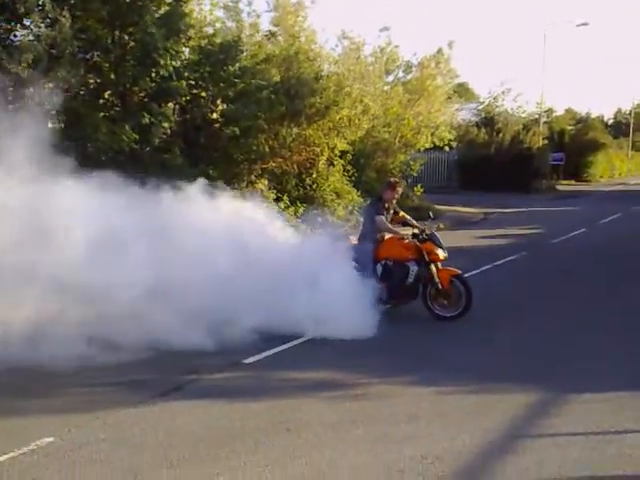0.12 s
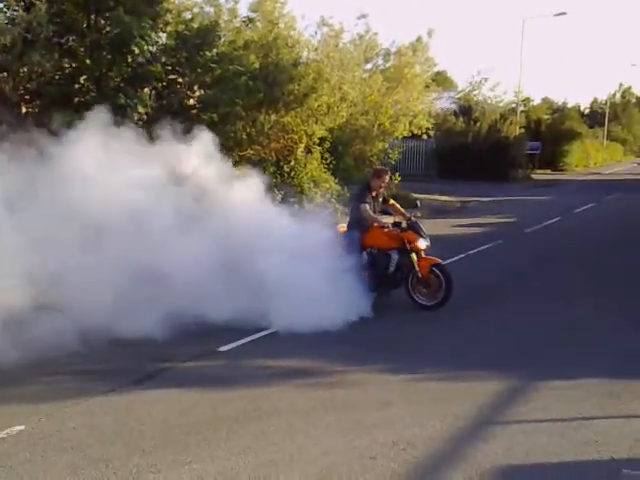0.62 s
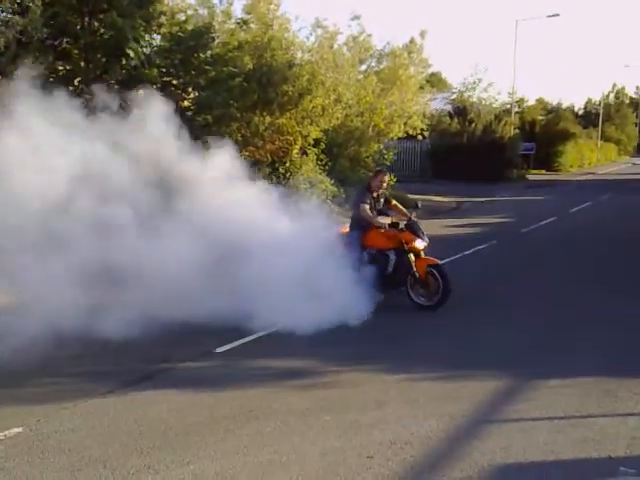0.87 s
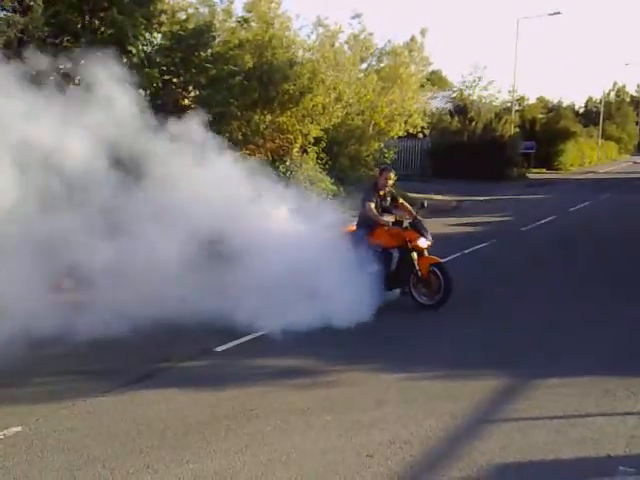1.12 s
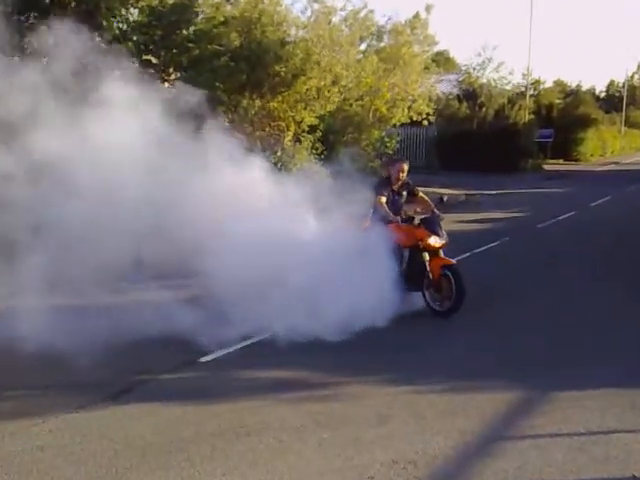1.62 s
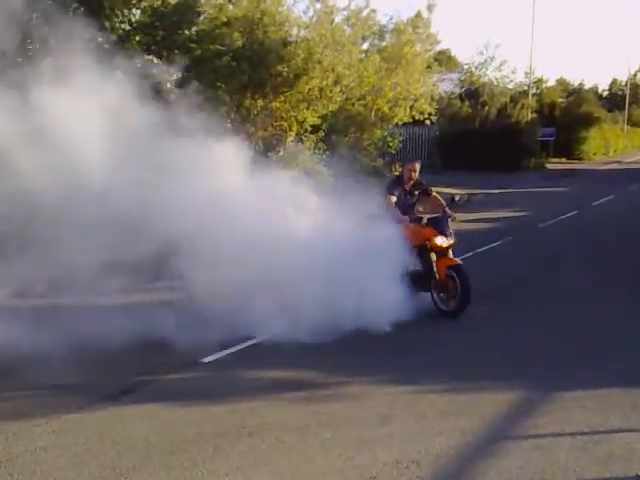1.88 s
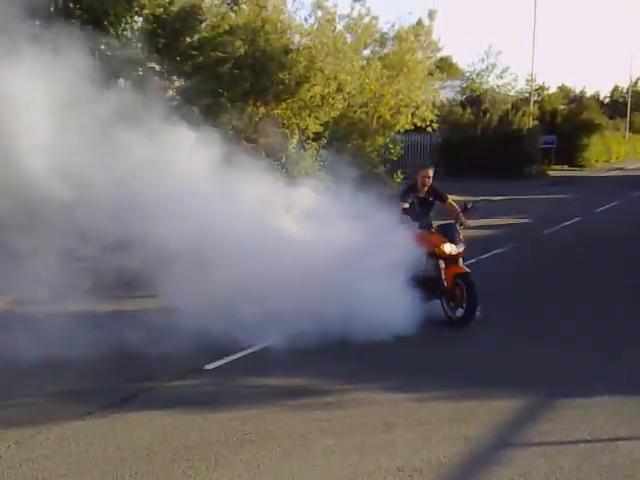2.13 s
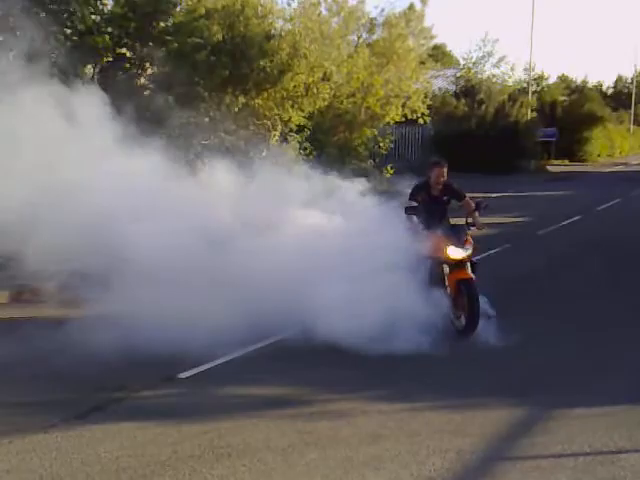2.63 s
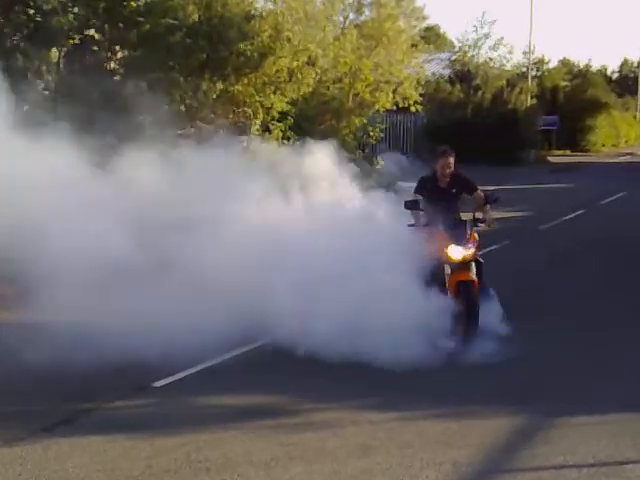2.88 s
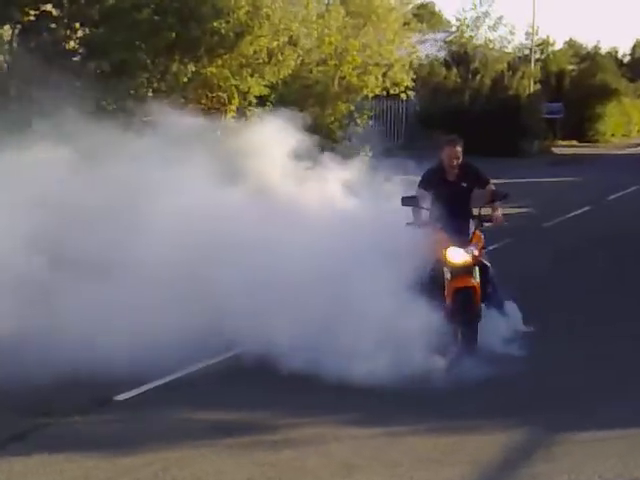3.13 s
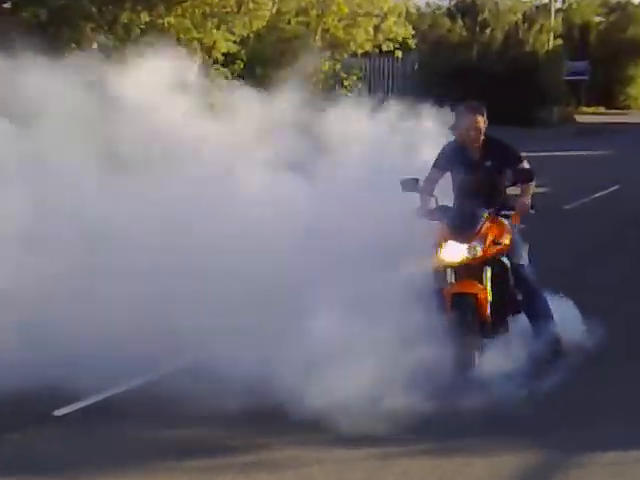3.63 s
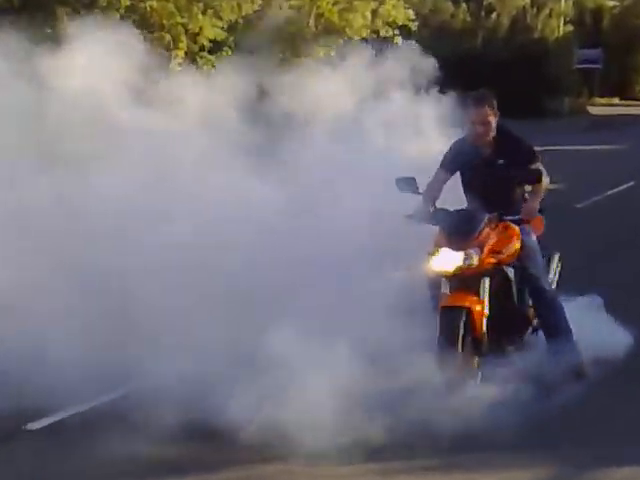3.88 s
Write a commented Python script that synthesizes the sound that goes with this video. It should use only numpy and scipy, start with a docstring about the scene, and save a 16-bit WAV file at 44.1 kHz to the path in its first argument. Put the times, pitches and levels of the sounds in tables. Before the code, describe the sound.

High-revving motorcycle engine sings steadily over harsh, hissing tyre and exhaust roar on a road.

```python
"""Motorcycle spinning its rear tyre

A four-cylinder motorcycle holds high revs on an open road while its rear tyre spins and smokes.
The exhaust sings on the firing rate, with weaker sines on other multiples of the engine cycle.
Rough exhaust flow and scrubbing rubber roar as noise through fixed resonances, and a gear whines.
Two ticks of bright noise, a brief engine squeal of wavering phase and a double knock pass."""
import sys
import numpy as np
from scipy import signal
from scipy.fft import rfft, irfft
from scipy.io import wavfile

SR = 44100
rng = np.random.default_rng(int(sys.argv[2]) if len(sys.argv) > 2 else 0)


def gain_from_db(level_db):
    """Turn a decibel level (scalar or array-like) into a linear amplitude factor."""
    decades = np.asarray(level_db, float) / 20
    return 10 ** decades


def unload_wav(signal):
    """Save mono or channel-first audio to the path in sys.argv[1] as 16-bit WAV at rate SR, clipped to [-1, 1]."""
    wavfile.write(
        sys.argv[1],
        SR,
        np.round(np.clip(np.atleast_2d(signal).T, -1, 1) * 32767).astype(np.int16),
    )


N = 176400  # samples, 4 s
CYLINDERS = 4  # each fires once per four-stroke cycle


def rms_one(x):
    """Normalisation: scales a signal to unit root mean square."""
    return x / np.sqrt(np.mean(x ** 2) + 1e-20)


def in_time(rows):
    """Linear interpolation: draws each column after the first as a curve over time."""
    seconds, *columns = np.transpose(rows)
    return [np.interp(np.arange(N) / SR, seconds, column) for column in columns]


def drift(rate_hz):
    """Low-pass random process: white noise through two equal poles wanders slowly, rms 1."""
    step = 40  # samples between computed points
    pole = np.exp(-2 * np.pi * rate_hz * step / SR)
    settle = 2000  # points dropped while the filter settles
    white = rng.standard_normal(N // step + settle + 2)
    slow = signal.lfilter([1], [1, -2 * pole, pole * pole], white)[settle:]
    return np.interp(np.arange(N) / step, np.arange(len(slow)), rms_one(slow))


def coloured(points):
    """Spectral shaping: noise follows a (Hz, dB) curve, each octave flickering by itself; rms 1."""
    flicker_db, flicker_hz = 1.21, 6.6
    hz = np.arange(N // 2 + 1) * SR / N + 1
    point_hz, point_db = np.transpose(points)
    colour_db = np.interp(np.log(hz), np.log(point_hz), point_db)
    shaped = rfft(rng.standard_normal(N)) * gain_from_db(colour_db)
    octave = np.floor(np.log2(hz))
    total = 0
    for k in range(4, 14):  # 16 Hz to 16 kHz
        part = irfft(shaped * (octave == k), N)
        total = total + part * gain_from_db(flicker_db * drift(flicker_hz))
    return rms_one(total)


def resonance(x, hz, width_hz):
    """Damped resonance: a conjugate pole pair passes a band whose width follows from the damping."""
    r = np.exp(-np.pi * width_hz / SR)
    return signal.lfilter([1, 0, -1], [1, -2 * r * np.cos(2 * np.pi * hz / SR), r * r], x)


def tone(cycle, multiple, db, wander_db):
    """Harmonic partial: a sine on a multiple of the cycle, the higher ones wavering more in phase."""
    wander_hz = 2.0
    phase_wander = 0.018  # radians per multiple
    phase = rng.uniform(0, 2 * np.pi) + phase_wander * multiple * drift(wander_hz)
    level = np.sqrt(2) * gain_from_db(db + wander_db * drift(wander_hz))
    return level * np.sin(multiple * cycle + phase)


# Engine speed and firing tone. Each row: time in seconds, firing rate in Hz,
# rms level of the firing tone in dB before its random wander.
ENGINE = [(0.01, 245.4, -18.5), (0.13, 252.8, -19), (0.23, 255.5, -15.5), (0.29, 254.2, -18.6),
          (0.34, 246.5, -19), (0.41, 245.5, -20.5), (0.47, 244.4, -21.5), (0.57, 244.8, -18.9),
          (0.68, 243.6, -23), (0.77, 244.6, -23.5), (0.82, 243.5, -23.1), (0.86, 246, -22),
          (1.06, 253.4, -13.5), (1.33, 252.7, -16), (1.61, 249.9, -15.5), (1.68, 250.5, -17.5),
          (1.82, 251.4, -15), (1.95, 250.2, -17), (2.21, 256.7, -15.5), (2.51, 249, -16.8),
          (2.65, 244, -18.8), (2.81, 248.4, -16), (2.97, 249.6, -19.5), (3.07, 247.3, -19.4),
          (3.22, 239.7, -17.5), (3.3, 231, -20), (3.5, 235.7, -16), (3.57, 236.8, -18),
          (3.67, 234.3, -17.5), (3.78, 235.6, -18), (3.91, 230.6, -19.5), (3.94, 224.6, -21.5),
          (3.97, 219.2, -39), (3.99, 222.2, -23)]


def engine():
    """Phase integration: summed firing rate gives the four-stroke cycle's phase; also the firing level."""
    firing_hz, firing_db = in_time(ENGINE)
    cycle = 2 * np.pi * np.cumsum(firing_hz) / SR / CYLINDERS
    return cycle, firing_db


# Tones whose strength changes with time. Each row: time in seconds, then the level in dB of each
# tone in group one, two, three, four and five of the strong multiples, before its random wander.
STRONG_TONES = [(0.01, -39, -40.5, -36.5, -35.5, -42), (0.18, -38, -35, -32.5, -31, -33.5),
                (0.33, -39, -42, -56, -38, -37), (0.42, -36.5, -45.5, -36.5, -38.5, -39),
                (0.83, -33, -40, -32.5, -36, -39), (1.42, -41.5, -47, -43.5, -37.1, -31),
                (1.82, -36.5, -45, -44, -35, -40.8), (2.07, -45, -42, -39, -32, -37.5),
                (2.31, -46.4, -37, -40, -36, -35), (2.56, -47, -47.4, -30.5, -37, -40),
                (2.74, -49, -43, -35.5, -47, -40), (2.95, -47.5, -38, -41, -33.5, -35.5),
                (3.38, -42, -40.5, -50.6, -48, -42), (3.569, -64, -35.5, -44, -40, -43.5),
                (3.68, -48.3, -36.5, -50, -40, -34), (3.83, -48, -40.5, -30.5, -44, -59),
                (3.99, -49.2, -46, -41, -41, -37)]
# Groups of strong tones. Each row: the multiples of the cycle rate that share a level.
STRONG_MULTIPLES = [(3,), (8,), (12,), (15,), (20, 24, 28)]
# Weaker tones. Each entry: multiple of the cycle rate.
WEAK_MULTIPLES = [1, 2, 5, 6, 7, 9, 10, 11, 13, 14, 16, 17, 18, 19, 21, 22, 23]
# Their strengths in the same order. Each entry: level in dB before its random wander.
WEAK_DB = [-54, -53, -54, -56, -57, -46, -48, -46, -44, -45, -41, -48, -46, -43, -47, -47, -47]


def exhaust_tones(cycle, firing_db):
    """Harmonic series: a motion that repeats each cycle sounds at its multiples, firing tone included."""
    firing_level = np.sqrt(2) * gain_from_db(firing_db + 0.56 * drift(21.0))
    out = firing_level * np.sin(CYLINDERS * cycle)
    for group, db in zip(STRONG_MULTIPLES, in_time(STRONG_TONES)):
        for multiple in group:
            out = out + tone(cycle, multiple, db, 1)
    for multiple, db in zip(WEAK_MULTIPLES, WEAK_DB):
        out = out + tone(cycle, multiple, db, 0.6 * np.sqrt(multiple))
    return out


def exhaust_rasp(cycle):
    """Periodic excitation: high multiples of the cycle form a rasp, set against unit white noise."""
    multiples = range(29, 64)
    over_noise_db, wander_db = 2.0, 2.8
    per_turn_db = 2.0  # even multiples, which repeat every crank turn, are stronger
    rasp = sum(tone(cycle, m, per_turn_db * (m % 2 == 0), wander_db) for m in multiples)
    # rms of unit white noise within the rasp's band, its tones about 62 Hz apart
    noise_share = np.sqrt(len(multiples) * 62 / (SR / 2))
    return noise_share * gain_from_db(over_noise_db) * rms_one(rasp)


# Roar of exhaust flow and tyre. Each row: time in seconds, reference level in dB, hiss relative
# to it in dB, dulling in dB per octave above 2 kHz, low rumble level in dB.
ROAR = [(0, -21.5, -9.5, -3.5, -29.5), (.12, -18.5, -11.5, -0.5, -35), (.48, -21, -11, -1, -37.5),
        (.9, -21.5, -7, -3, -38), (1.3, -22.5, -11, -2.7, -38.5), (1.76, -20.5, -13.5, 0.3, -36),
        (1.95, -24, -10, -2.7, -38), (2.3, -21.5, -12.5, 0.8, -34), (2.45, -23.5, -12, -2, -34.5),
        (2.75, -23.5, -12, -0.5, -34), (3.06, -22.5, -11.5, -0.8, -35.5), (3.31, -25, -12.5, -1.3, -32),
        (3.6, -24, -12, .6, -32.5), (3.75, -23.5, -13, -0.5, -28.5), (3.9, -22.5, -17, 1.5, -32.5),
        (4.0, -22, -13, 7, -31)]
# Broad colour of the roar. Each row: frequency in Hz, relative spectral density in dB per Hz.
ROAR_COLOUR = [(500, -28), (900, -17.5), (1300, -12), (1650, -14), (2000, -3), (2250, -15), (2800, -12.5),
               (3300, -17), (3500, -17), (4400, -24), (5600, -24), (6600, -27.5), (8000, -36.5)]
# Colour of the hiss. Each row: frequency in Hz, relative spectral density in dB per Hz.
HISS_COLOUR = [(5000, -24), (7000, -11), (8000, -16), (9000, -13.5), (11000, -10), (11500, -6.5),
               (12000, -0.5), (12450, -0.5), (12900, -0.5), (13500, -7), (14500, -13), (15600, -16)]
# Colour of the low rumble. Each row: frequency in Hz, relative spectral density in dB per Hz.
RUMBLE_COLOUR = [(30, -40), (60, -30), (120, -10), (170, -10), (300, -3.5), (400, -12), (600, -5),
                 (780, -2), (980, -5), (1250, 0), (1500, 1.5), (1800, -28)]
# Resonances in the roar. Each row: frequency in Hz, width of one filter pass in Hz,
# level in dB relative to the roar's reference, before dulling and random wander.
RESONANCES = [(1810, 115, -10), (1914, 110, -7.5), (2044, 143, -7.5), (2415, 126, -8), (2530, 118, -7.5),
              (2655, 108, -12), (3030, 234, -12), (3257, 103, -19), (3740, 150, -18), (4990, 560, -27.5),
              (6100, 660, -22.5)]


def roar(cycle):
    """Source and filter: noise and rasp excite fixed resonances amid broad noise, hiss and rumble."""
    level_db, hiss_db, dull_db, rumble_db = in_time(ROAR)
    throb_depth = 0.087  # once per cycle
    rasp = exhaust_rasp(cycle)
    mid = gain_from_db(-6.5 - dull_db * 0.44) * coloured(ROAR_COLOUR)
    for hz, width_hz, db in RESONANCES:
        source = rng.standard_normal(N) + rasp
        ringing = rms_one(resonance(resonance(source, hz, width_hz), hz, width_hz))
        band_level = gain_from_db(db + 0.5 * drift(1.9) - dull_db * np.log2(hz / 2000))
        throb = 1 + throb_depth * np.sin(cycle + rng.uniform(0, 2 * np.pi))
        mid = mid + band_level * throb * ringing
    hiss = gain_from_db(hiss_db) * coloured(HISS_COLOUR)
    rumble = gain_from_db(rumble_db) * coloured(RUMBLE_COLOUR)
    return gain_from_db(level_db) * (mid + hiss) + rumble


# Gear whine. Each row: time in seconds, level in dB before its random wander.
WHINE = [(0, -62), (.5, -53), (1.1, -47.5), (1.8, -47.5), (2.0, -54), (3.0, -59), (4, -64)]


def whine(cycle):
    """Gear meshing: teeth meet at a fixed ratio to engine speed, the tone blurred by random phase."""
    meshes_per_firing = 24.4
    level_db, = in_time(WHINE)
    blur = 0.75 * (drift(40.0) + 2.5 * drift(8.0))  # radians
    level = np.sqrt(2) * gain_from_db(level_db + 3.3 * drift(25.0))
    return level * np.sin(meshes_per_firing * CYLINDERS * cycle + blur)


# Ticks, perhaps thrown grit. Each row: time of the crest in seconds, noise rms at the crest in dB.
TICKS = [(.541, -24), (.884, -34)]


def ticks():
    """Gated noise: band-passed noise under Gaussian envelopes gives bright puffs of a few milliseconds."""
    low_hz, high_hz, half_length_s = 7343, 11000, 0.0017
    t = np.arange(N) / SR
    band = signal.butter(2, [low_hz, high_hz], "band", fs=SR, output="sos")
    bright = rms_one(signal.sosfilt(band, rng.standard_normal(N)))
    envelope = 0
    for crest_s, db in TICKS:
        envelope = envelope + gain_from_db(db) * np.exp(-np.minimum(((t - crest_s) / half_length_s) ** 2, 50))
    return bright * envelope


# Engine squeal. The one row: start of full level in seconds, its end in seconds, length of the fade
# on either side in seconds, centre frequency in Hz, rms level in dB before its random wander.
SQUEAL = (3.5, 3.5, 0.15, 2546.5, -31)


def squeal():
    """Random modulation: a high engine tone rings, wavering in phase and strength, as it fades in and out."""
    start_s, end_s, fade_s, hz, db = SQUEAL
    t = np.arange(N) / SR
    shape = np.clip(np.minimum(t - start_s, end_s - t) / fade_s + 1, 0, 1)
    level = np.sqrt(2) * shape * gain_from_db(db + 2.52 * drift(13.0))
    return level * np.sin(2 * np.pi * hz * t + 1.7 * drift(8.6))


# Knocks. Each row: time of the crest in seconds, envelope crest in dB, frequency in Hz,
# half-length in seconds.
KNOCKS = [(3.6846, -8, 1304, 0.0018), (3.699, -13.5, 1230, 0.0028)]


def knocks():
    """Tone bursts: sines under Gaussian envelopes swell and die within a few milliseconds."""
    t = np.arange(N) / SR
    out = 0
    for crest_s, db, hz, half_length_s in KNOCKS:
        since = t - crest_s
        envelope = gain_from_db(db) * np.exp(-np.minimum((since / half_length_s) ** 2, 50))
        out = out + envelope * np.sin(2 * np.pi * hz * since)
    return out


def scene():
    """Superposition: the pressures of all sources add, as one channel."""
    cycle, firing_db = engine()
    machine = exhaust_tones(cycle, firing_db) + roar(cycle) + whine(cycle)
    passing = ticks() + squeal() + knocks()
    return (machine + passing)[None]


def roll_off(x):
    """The treble ends steeply here."""
    return signal.sosfilt(signal.butter(12, 15740, fs=SR, output="sos"), x)


def record(dry):
    """Direct transmission: the summed sound goes on with no added room or level change."""
    return roll_off(dry)


dry = scene()
out = record(dry)
unload_wav(out)
```